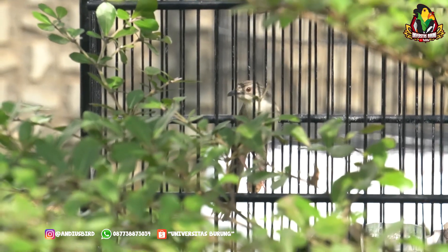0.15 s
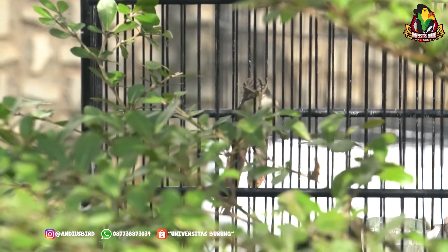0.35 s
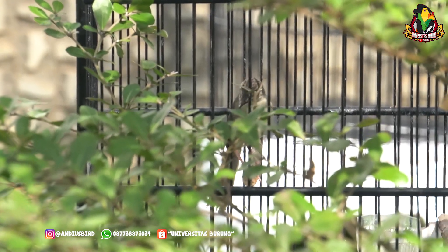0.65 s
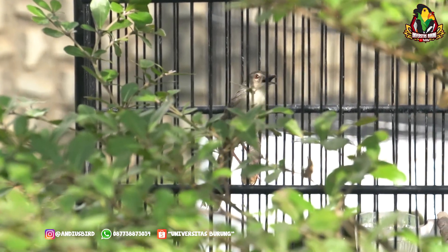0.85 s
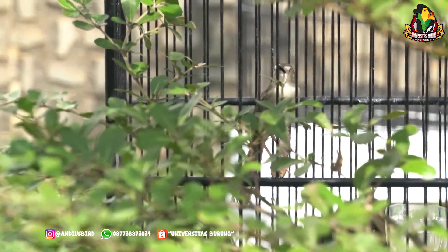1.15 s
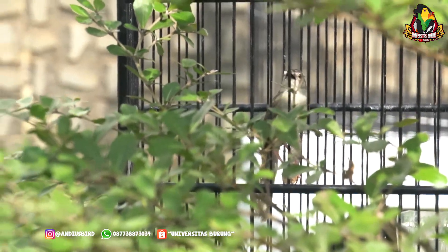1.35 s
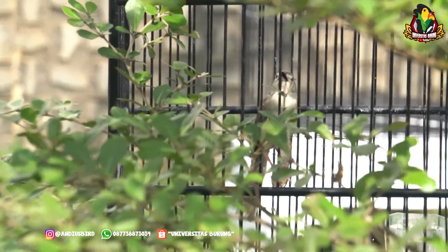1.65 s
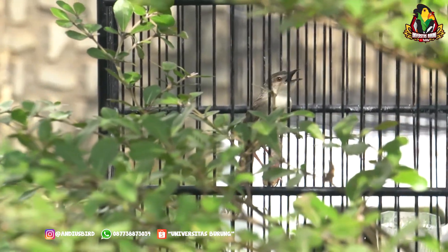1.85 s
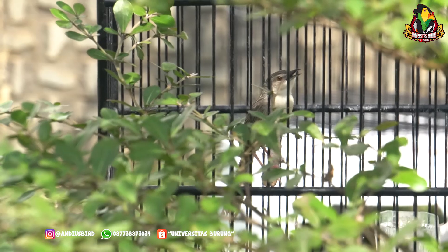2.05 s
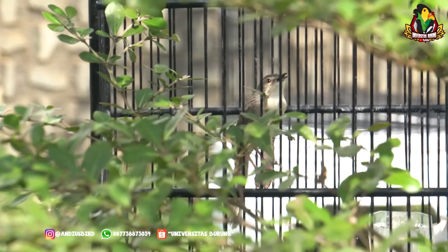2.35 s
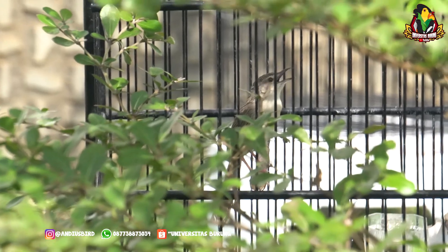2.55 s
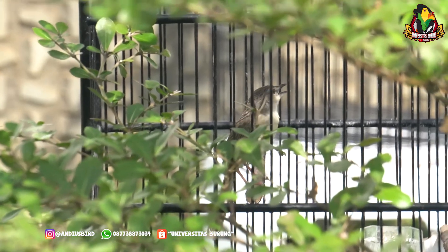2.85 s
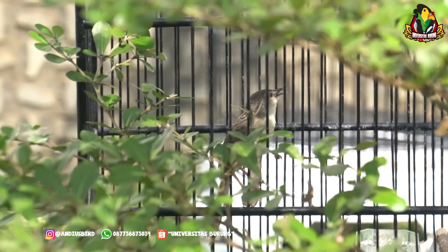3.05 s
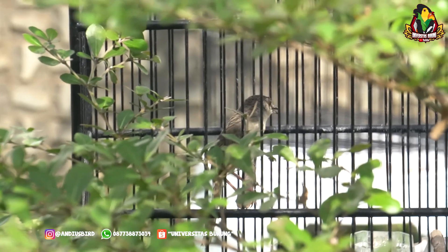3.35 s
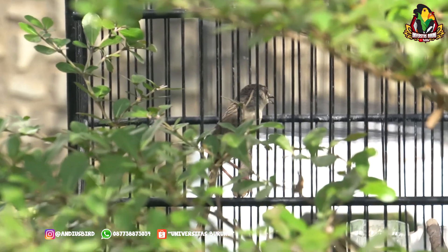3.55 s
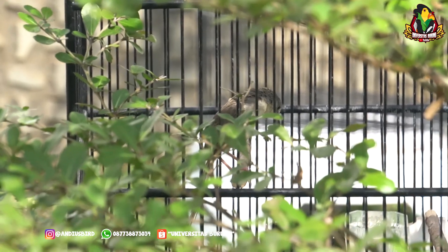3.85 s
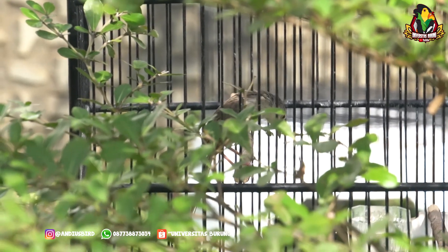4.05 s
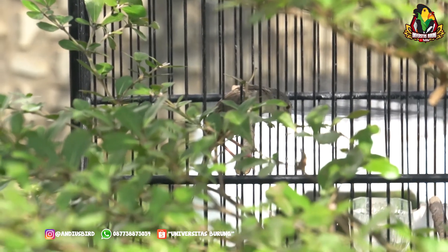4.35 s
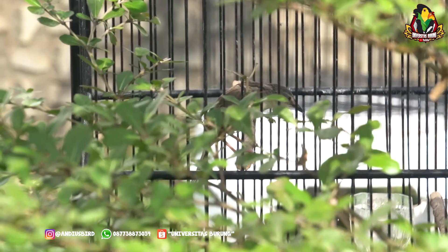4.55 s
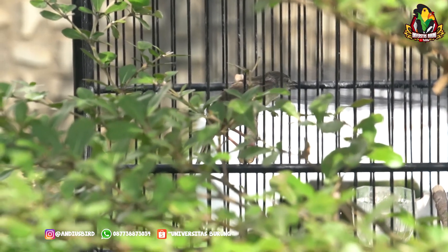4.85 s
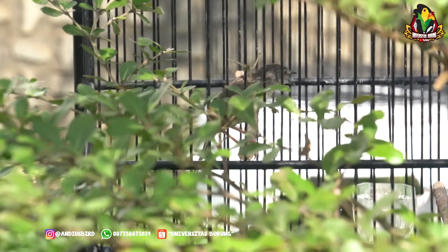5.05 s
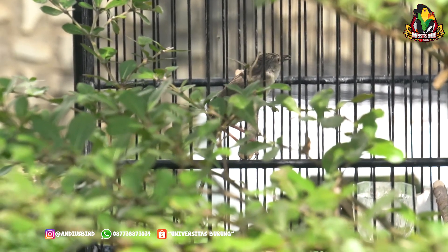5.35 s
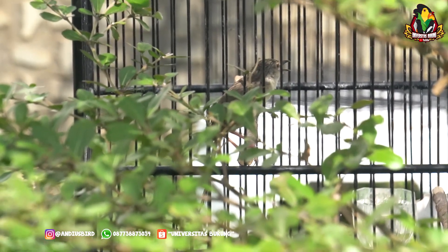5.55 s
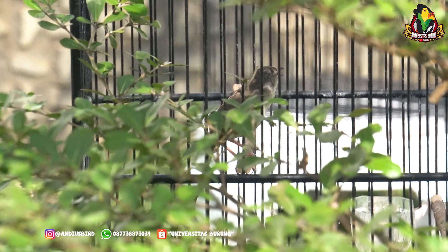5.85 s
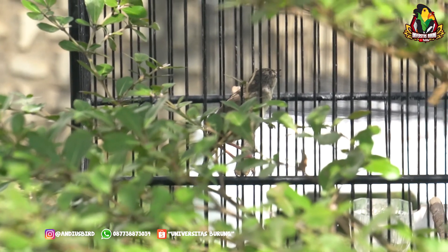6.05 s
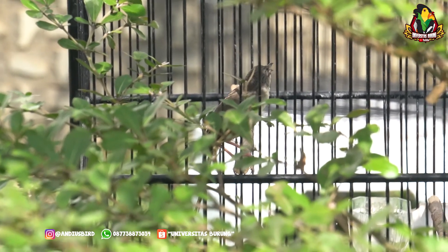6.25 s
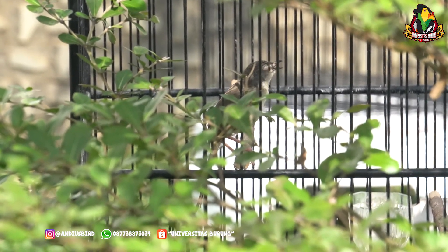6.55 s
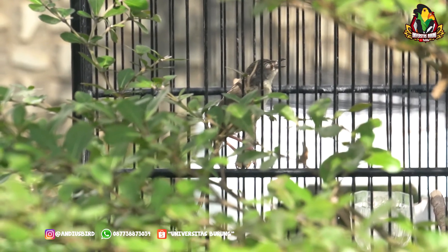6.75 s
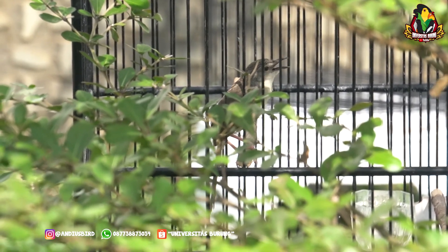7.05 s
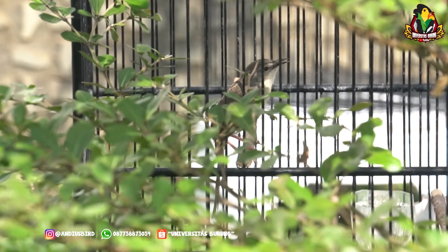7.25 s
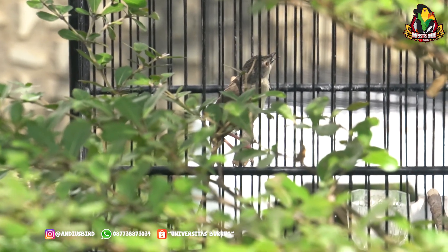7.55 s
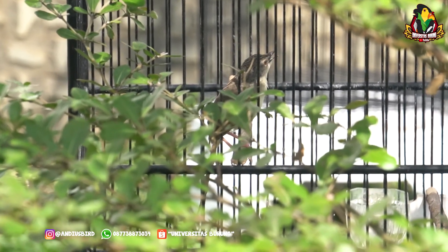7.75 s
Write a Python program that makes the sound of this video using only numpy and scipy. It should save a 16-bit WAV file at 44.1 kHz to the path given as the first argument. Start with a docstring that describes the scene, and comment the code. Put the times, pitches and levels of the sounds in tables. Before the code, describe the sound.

A small caged songbird sings close to the microphone in a walled yard, over soft low rumble, a gentle rush and a faint continuous high trill from a far bird. It opens with a quick warble and chirrup to 0.4 s, pauses, then gives quiet hoarse rasps from 0.75. Fast piercing falling whistles and rounder arching ones run from 1.1 to 1.65. A distant hoot at 1.1, a rooster crow around 1.5 to 2.4 and another hoot at 2.1 echo faintly. A dull thud lands at 1.8; whistles return 1.95-2.45. A hollow knock at 2.8 leads into whistles to 3.4 and warbles to 3.9, with a faint jerky scrape from 3 to 4. Brief warbling to 4.2, then sparse rasps and a weak bump near 4.7. Dense warbling fills 5.15-5.8, whistles 6.0-6.5, soft rasps, then warbles and a final strong whistle run 6.7-7.35, leaving quiet yard ambience.

```python
"""Warbled notes of a small caged songbird, close by in a walled yard, over a thin far trill and a faint rumble.
The songbird is a gliding harmonic voice: whistled slurs and arches, clear notes, chirrups, rasps and ticks.
A distant rooster crows once between a far hoot and the end of another; both are harmonic, heard as echoes.
Something hollow nearby is knocked and dragged: noise bursts excite decaying sines.
The rumble and a low rush are shaped noise."""
import sys
import numpy as np
from scipy import signal
from scipy.fft import rfft, irfft
from scipy.io import wavfile
from scipy.ndimage import uniform_filter1d

SR = 44100
rng = np.random.default_rng(int(sys.argv[2]) if len(sys.argv) > 2 else 0)


def pcm_store(signal):
    """Save signal as 16-bit PCM."""
    levels = np.round(np.clip(np.atleast_2d(signal), -1, 1) * 32767)
    wavfile.write(sys.argv[1], SR, levels.astype(np.int16).T)


N = 348831
TIME = np.arange(N) / SR


def undb(db):
    """Decibels to gain."""
    return 10 ** (np.asarray(db) / 20)


def unit(x):
    """Scale to rms 1."""
    return x / np.sqrt(np.mean(x ** 2))


def colour(hz, points):
    """Gain at hz of a (freq_hz, gain_db) spectrum, interpolated over log frequency."""
    freq_hz, gain_db = np.transpose(points)
    return undb(np.interp(np.log(hz + 1), np.log(freq_hz), gain_db))


def noise(points):
    """Gaussian noise with a (freq_hz, gain_db) spectrum, rms 1."""
    spectrum = rfft(rng.standard_normal(N))
    return unit(irfft(spectrum * colour(np.fft.rfftfreq(N, 1 / SR), points), N))


def wander(count, hz):
    """Random motion: noise low-passed at hz, rms 1."""
    lowpass = signal.butter(2, hz, fs=SR, output="sos")
    white = rng.standard_normal(max(count, SR // 2) + SR // 10)
    return unit(signal.sosfilt(lowpass, white[-count:]))


def fade(t, t60_s):
    """Exponential decay, 60 dB in t60_s."""
    return np.exp(-np.log(1000) * t / t60_s)


def add(out, start_s, x):
    """Mix x into out at start_s."""
    i = max(int(start_s * SR), 0)
    out[i:i + len(x)] += x[:max(N - i, 0)]


def edges(t, ramp_s):
    """Sine-squared start and stop of a note."""
    from_edge_s = np.minimum(t - t[0], t[-1] - t)
    return np.sin(np.pi / 2 * np.clip(from_edge_s / ramp_s, 0, 1)) ** 2


def voice(hz, tract, octave_db, count=6):
    """Harmonics of a vibrating membrane, weighted by the tract as they glide through it; constant power."""
    k = np.arange(1, count + 1)[:, None]
    weight = undb(octave_db * np.log2(k)) * colour(k * hz, tract) * (k * hz < SR / 2)
    phase = 2 * np.pi * k * np.cumsum(hz) / SR
    return np.sum(weight * np.sin(phase), 0) / np.sqrt(np.sum(weight ** 2, 0))


def echoes(x, t60_s, early_t60_s=0.31, early_db=4):
    """Convolve with decaying noise: scatter from bars and leaves, then yard walls; unit-energy response."""
    t = TIME[:SR]
    tail = noise([(200, 9.0), (6500, -1.0), (9000, 0.5), (16000, 2.5)])[:SR]
    decay = fade(t, t60_s) + undb(early_db) * fade(t, early_t60_s)
    tail *= decay * np.clip(t / 0.00078, 0, 1)
    return signal.fftconvolve(x, tail / np.linalg.norm(tail))[:N]


RUMBLE_DB = -45.5
# outdoor rumble spectrum: freq_hz, density_db_per_hz
RUMBLE_SPECTRUM = [(25, -26), (70, 1.5), (160, 3), (400, -15.5), (2500, -15.5), (6000, -7.5),
                   (16000, -37.5)]
# low rush from further off, level course: time_s, level_db
RUSH_LEVEL = [(0, -53), (1.2, -46.5), (3.8, -50), (4.3, -55)]
# rush spectrum: freq_hz, density_db_per_hz
RUSH_SPECTRUM = [(100, -13), (300, -1), (1600, -6.5), (16000, -38)]


def outdoors():
    """Shaped noise: a steady rumble, and a rush that unevenly swells and sinks."""
    rush_db = np.interp(TIME, *np.transpose(RUSH_LEVEL)) + 0.61 * wander(N, 12)
    return undb(RUMBLE_DB) * noise(RUMBLE_SPECTRUM) + undb(rush_db) * noise(RUSH_SPECTRUM)


def far_bird(period_s=0.048, length_s=0.0227, count=220):
    """A continuous thin trill of short drooping sines, some followed by a longer gap."""
    out, t = np.zeros(N), np.arange(0, length_s, 1 / SR)
    chance = rng.standard_normal((count, 4))
    gap = 0.6 * (chance[:, 1] > 0.6)
    starts_s = np.cumsum(period_s * (1 + 0.12 * chance[:, 0] + gap)) - period_s
    for start_s, (loud, sharp) in zip(starts_s, chance[:, 2:]):
        hz = (5830 - 520 * (t / length_s) ** 2) * (1 + 0.01 * sharp)
        tone = np.sin(2 * np.pi * np.cumsum(hz) / SR)
        add(out, start_s, undb(2.4 * loud) * tone * edges(t, 0.0034))
    return out


HOOT_HZ = 709
# colour of the far calls: freq_hz, gain_db
FAR_CALL = [(700, -5.5), (1450, 3.5), (2800, -20)]
# hoots: start_s, length_s, relative_level_db
HOOTS = [(1.135, 0.23, -40.5), (2.125, 0.42, -41.5)]


def hoots():
    """Two calls level in pitch, their second harmonic strongest."""
    swell = sum(undb(db) * np.sin(np.pi * np.clip((TIME - start_s) / length_s, 0, 1))
                for start_s, length_s, db in HOOTS)
    hz = HOOT_HZ * (1 + 0.0223 * wander(N, 62.4))
    return swell * voice(hz, FAR_CALL, octave_db=0)


# crow: time_s, pitch_hz, relative_level_db
CROW = [(1.361, 522, -62), (1.599, 638, -46), (1.68, 793.4, -45), (2.05, 814, -60), (2.3, 845, -44),
        (2.45, 827, -82)]


def rooster():
    """One crow that climbs to a held note, hoarse from random pitch and level."""
    time_s, pitch_hz, level_db = np.transpose(CROW)
    hz = np.interp(TIME, time_s, pitch_hz) * (1 + 0.055 * wander(N, 200))
    course_db = np.interp(TIME, time_s, level_db, left=-np.inf, right=-np.inf)
    return voice(hz, FAR_CALL, octave_db=-2) * undb(course_db + 4.0 * wander(N, 21))


# modes of the hollow object: freq_hz, gain_db, t60_s
HOLLOW = [(308.4, 8, 0.33), (678, 0, 0.28), (910, -1, 0.16)]


def hollow(x):
    """Ring of the hollow object: decaying sine modes, unit-energy response."""
    t = TIME[:SR]
    ring = sum(undb(db) * np.sin(2 * np.pi * hz * t) * fade(t, t60_s) for hz, db, t60_s in HOLLOW)
    return signal.fftconvolve(x, ring / np.linalg.norm(ring))[:N]


# dull bumps: start_s, level_db, relative_ring_db, lowpass_hz
BUMPS = [(1.814, -22, -28, 760), (2.843, -26.5, -4, 2220), (4.678, -35.5, -13, 2500)]


def bumps():
    """Low-passed noise blows that set the hollow object ringing."""
    out = np.zeros(N)
    thud = noise([(70, -20), (330, -5.5), (1800, -7.5), (12000, -34)])
    for start_s, db, ring_db, lowpass_hz in BUMPS:
        since_s = TIME - start_s
        dull = signal.sosfilt(signal.butter(2, lowpass_hz, fs=SR, output="sos"), thud)
        blow = undb(db) * dull * fade(np.maximum(since_s, 0), 0.37) * np.clip(since_s / 0.0044, 0, 1)
        out += blow + undb(ring_db - 6.5) * hollow(blow)
    return out


# dragging: time_s, relative_level_db
DRAG = [(2.95, -60.5), (3.75, -47.5), (4.05, -67)]


def drag():
    """Jerky scrape noise, heard directly and through the hollow object."""
    course_db = np.interp(TIME, *np.transpose(DRAG), left=-np.inf, right=-np.inf)
    grip = undb(course_db + 3 * wander(N, 14))
    scrape = grip * noise([(60, -4), (250, 0.0), (1500, -2), (16000, -35)])
    return undb(5.0) * scrape + undb(-5.5) * hollow(scrape)


FOOT_HZ = 1962  # whistle pitch at the foot of its fall
WHISTLE_END = 1.167  # a whistle trails on to this multiple of its fall
RISE_BEND, ARCH_BEND = 0.75, 1.3  # above 1, the pitch lingers at the top
STRAIGHT_FALL_S = 0.024  # a slur this quick falls evenly; a longer one lingers at the top
# throat and open beak: freq_hz, gain_db
THROAT = [(2000, -12), (2450, -8.5), (3300, 5), (4000, 7.5), (5200, 6), (6700, -2), (7900, -7.5),
          (13000, -14), (16000, -35)]
# air pressure along a whistle: place (-1 start of rise, 0 top, 1 foot of fall), relative_db
PUSH = [(-0.87, -39.5), (-0.051, -4.5), (-0.15, -3.5), (0.19, -4), (0.58, -14), (1.084, -33.5)]


def whistle(top_hz, rise_s, fall_s, bend, attack_s):
    """A nearly pure note: pitch and pressure climb to the top and sink again, a little unevenly."""
    t = np.arange(-int(rise_s * SR), int(WHISTLE_END * fall_s * SR)) / SR
    place = t / np.where(t < 0, rise_s, fall_s)
    depth = np.abs(place) ** np.where(t < 0, RISE_BEND, bend)
    hz = top_hz * (FOOT_HZ / top_hz) ** depth * (1 + 0.0092 * wander(len(t), 213))
    push_db = np.interp(place, *np.transpose(PUSH)) + 1.4 * wander(len(t), 125)
    return voice(hz, THROAT, octave_db=-12.5) * undb(push_db + 1) * edges(t, attack_s)


# falling whistles: start_s, top_hz, fall_s, relative_level_db
SLURS = [(1.136, 6620, 0.021, -4), (1.204, 6760, 0.022, -0.5), (1.2708, 7700, 0.023, -0.5),
         (1.342, 7860, 0.024, 1), (1.9543, 6600, 0.023, -1.5), (2.0236, 7200, 0.026, -6),
         (2.176, 7230, 0.026, -1.5), (2.664, 6940, 0.022, 0), (2.8916, 6750, 0.023, -0.5),
         (2.958, 7630, 0.027, 1), (3.026, 7700, 0.027, 1.5), (3.104, 7700, 0.029, 0.5),
         (6.0229, 6730, 0.024, -1.5), (6.097, 7790, 0.022, 0), (6.169, 7300, 0.028, 1),
         (6.246, 7710, 0.034, -0.5), (6.86, 7460, 0.028, 0), (6.9346, 7600, 0.028, 2),
         (7.013, 7600, 0.029, 0), (7.0895, 7540, 0.031, 0)]
# rising then falling whistles: top_s, top_hz, rise_s, fall_s, relative_level_db
ARCHES = [(1.405, 6850, 0.027, 0.033, -4), (1.472, 6650, 0.034, 0.037, -4), (1.54, 6690, 0.04, 0.04, -5),
          (1.6025, 6930, 0.017, 0.038, -4), (2.101, 6985, 0.007, 0.03, -1.5),
          (2.2455, 7390, 0.016, 0.029, -1.5), (2.32, 6470, 0.037, 0.044, -4.5),
          (2.3925, 6430, 0.022, 0.051, -3), (3.173, 7420, 0.012, 0.032, -2.5),
          (3.247, 7250, 0.041, 0.034, -4), (3.318, 7090, 0.025, 0.048, -2.5),
          (5.494, 7150, 0.012, 0.031, -8), (5.565, 7060, 0.02, 0.036, -11), (5.629, 6930, 0.019, 0.048, -9),
          (5.689, 7070, 0.014, 0.047, -4), (6.31, 7250, 0.035, 0.036, -4),
          (6.384, 7060, 0.035, 0.036, -3.5), (6.444, 6800, 0.013, 0.048, -3),
          (6.7901, 5890, 0.0065, 0.021, -5), (7.151, 7110, 0.038, 0.033, -4),
          (7.2216, 6900, 0.035, 0.048, -4), (7.2998, 6850, 0.014, 0.044, -4)]


def whistles():
    """Slurs start at their top pitch; arches rise to it first."""
    out = np.zeros(N)
    for start_s, hz, fall_s, db in SLURS:
        add(out, start_s, undb(db) * whistle(hz, 0, fall_s, fall_s / STRAIGHT_FALL_S, attack_s=0.0035))
    for top_s, hz, rise_s, fall_s, db in ARCHES:
        add(out, top_s - rise_s, undb(db) * whistle(hz, rise_s, fall_s, ARCH_BEND, attack_s=0.0033))
    return out


WOBBLE, RASP_WOBBLE, WOBBLE_HZ = 0.01, 0.03, 90.5  # pitch share, share added at roughness 1, speed
NOTE_RAMP_S = 0.001  # edge ramp at FULL_EFFORT_DB
FULL_EFFORT_DB, RAMP_DOUBLES_DB = -6, 5.5  # ramp doubles for each such drop in level


def warble(rows, rough, leap_rough=0.0048, jitter=0.0795, shimmer=0.37, onset_rough=0.43, settle_s=0.008):
    """Reedy note; the syrinx is chaotic at onset and pitch leaps, its second side joins out of tune."""
    time_s, pitch_hz, level_db = np.transpose(rows)
    t = np.arange(time_s[0], time_s[-1], 1 / SR)
    octave = uniform_filter1d(np.interp(t, time_s, np.log2(pitch_hz)), size=120)
    leap = uniform_filter1d(np.abs(np.gradient(octave)) * SR, size=350)  # octaves a second
    onset = np.exp((t[0] - t) / settle_s)
    chaos = np.clip(rough + leap_rough * leap + onset_rough * onset, 0, 1)
    hz = 2 ** octave * (1 + (WOBBLE + RASP_WOBBLE * rough) * wander(len(t), WOBBLE_HZ))
    # the note, second side, undertone: pitch_ratio, strength, tilt_db_per_octave
    sides = [(0.99, 0.8, -5), (0.66, 0.5 * chaos, -1.5), (0.5, 0.31 * chaos, 3.5)]
    tone = 0
    for ratio, strength, tilt_db in sides:
        jittered_hz = ratio * hz * (1 + jitter * chaos * wander(len(t), 740))
        tone = tone + strength * voice(jittered_hz, THROAT, tilt_db)
    ramp_s = NOTE_RAMP_S * 2 ** ((FULL_EFFORT_DB - level_db.max()) / RAMP_DOUBLES_DB)
    ramp_s = min(ramp_s, (t[-1] - t[0]) / 3)
    flutter = 1 + shimmer * np.sqrt(chaos) * wander(len(t), 204)
    loudness = undb(np.interp(t, time_s, level_db)) * edges(t, ramp_s)
    sound = tone * flutter / np.sqrt(1 + chaos ** 2) * loudness
    # so small a beak radiates little below the foot pitch
    beak = signal.butter(N=8, Wn=FOOT_HZ, btype="high", fs=SR, output="sos")
    return signal.sosfilt(beak, np.pad(sound, (0, SR // 100)))


GLIDE_S, NOTE_SWELL_DB = 0.0065, 1.5  # glide time constant; a note's ends are this much softer


def note(start_s, length_s, hz, start_octaves, end_octaves, db):
    """Course (time_s, pitch_hz, level_db): glides onto its pitch, swells and glides off."""
    t = np.arange(0, length_s, 1 / SR)
    octaves = start_octaves * np.exp(-t / GLIDE_S) + end_octaves * np.exp((t - length_s) / GLIDE_S)
    swell_db = db - NOTE_SWELL_DB * (2 * t / length_s - 1) ** 2
    return np.column_stack([start_s + t, hz * 2 ** octaves, swell_db])


NOTE_ROUGH = 0.15
# clear notes: start_s, length_s, pitch_hz, start_octaves, end_octaves, relative_level_db
NOTES = [(0, 0.025, 5400, -0.11, 0.47, -6.5), (.028, 0.05, 4043, 0.21, .05, -4.5),
         (.078, 0.021, 4685, 0.25, -0.058, -9), (1.975, 0.042, 2723, -0.42, -0.15, -6),
         (2.018, 0.046, 3973, -0.097, -0.12, -8.5), (2.058, .024, 3140, 0.25, 0.12, -9.5),
         (2.079, 0.027, 6816, -0.21, 0.025, -9), (2.127, 0.053, 4026, -0.53, 0.22, -5.5),
         (2.183, 0.051, 4850, -.12, -0.14, -9.5), (3.358, 0.055, 3310, -0.17, -0.14, -6.5),
         (3.416, 0.04, 6540, -0.18, 0.11, -9), (3.487, 0.02, 2216, -0.059, 0.22, -12),
         (3.534, 0.033, 6610, -.1, 0.037, -6.5), (4.008, 0.037, 2404, .1, -0.31, -13),
         (4.044, 0.051, 3830, -0.56, 0.4, -7), (4.09, 0.035, 6360, -.45, -0.35, -9.5),
         (4.152, 0.033, 3478, 0.18, -0.43, -9.5), (4.186, 0.02, 5120, 0.31, -0.065, -10.5),
         (5.163, 0.014, 2080, -0.17, 0.24, -7), (5.18, 0.027, 6530, -0.45, -0.052, -9.5),
         (5.208, .058, 3420, 0.39, .35, -5.5), (5.265, 0.03, 5050, 0.35, 0.066, -9),
         (5.304, .035, 2290, -0.24, 0.79, -6.5), (5.339, 0.033, 4405, 0.71, 0.052, -10.5),
         (5.34, .029, 2673, 0.036, -0.23, -7.5), (5.369, 0.052, 4035, -0.31, -0.026, -7),
         (5.412, 0.029, 3105, .2, 0.032, -8.5), (5.436, 0.034, 6780, -0.35, -0.013, -8.5),
         (5.487, 0.051, 3930, -0.4, 0.34, -7), (5.541, .024, 4590, -0.08, 0.38, -6),
         (6.733, 0.031, 3266, 0.16, 0.0041, -8), (6.76, 0.019, 2686, 0.066, 0.92, -9),
         (6.805, 0.039, 4880, -0.024, 0.012, -6), (6.848, .022, 2430, 0.044, .5, -12),
         (6.886, 0.017, 2685, 1, 0.14, -8.5), (6.905, 0.019, 4990, -0.054, -0.036, -6.5)]


def clear_notes():
    """Warbled notes, each gliding onto its pitch and flicking off it."""
    out = np.zeros(N)
    for start_s, *shape in NOTES:
        add(out, start_s, warble(note(start_s, *shape), NOTE_ROUGH))
    return out


RASP_PEAK = 0.352  # share of its length at which a rasp is loudest
RASP_FADE_DB, RASP_SAG = 9, 0.06  # its ends are softer, and flatter by this share


def rasp(start_s, length_s, hz, db):
    """Course (time_s, pitch_hz, level_db): pitch and level rise with the effort and sink with it."""
    slack = hz * (1 - RASP_SAG), db - RASP_FADE_DB
    return [(start_s, *slack), (start_s + RASP_PEAK * length_s, hz, db), (start_s + length_s, *slack)]


# rasps: start_s, length_s, pitch_hz, relative_level_db, roughness_0_to_1
RASPS = [(0.748, 0.13, 2822, -20.5, 0.42), (.87, .07, 2196, -24.5, 0.3), (0.912, 0.088, 6660, -28, 0.2),
         (0.983, .19, 2600, -20, 0.84), (1.069, 0.14, 4070, -18.5, 0.07), (1.75, .1, 4800, -30.5, .2),
         (2.796, 0.11, 4840, -29.5, 0.13), (3.503, 0.035, 4390, -4, .8), (4.619, 0.09, 4500, -17, 0.67),
         (4.686, 0.078, 5000, -17.5, 0.23), (5.171, .014, 5000, -5, .9), (5.466, 0.031, 2798, -6, 0.64),
         (6.405, .05, 4420, -14.5, .2), (6.465, .07, 3023, -14, 0.46), (6.517, 0.11, 4100, -15, 0.64),
         (6.716, 0.028, 4950, -8, 0.47), (6.773, 0.023, 5740, -5, 0.5)]


def rasps():
    """Hoarse notes that swell and die away."""
    out = np.zeros(N)
    for start_s, length_s, hz, db, rough in RASPS:
        add(out, start_s, warble(rasp(start_s, length_s, hz, db), rough))
    return out


# chirrup, a rise, a low buzz and then a dip: time_s, pitch_hz, relative_level_db
CHIRRUP = [(0, 2500, -20), (.012, 2850, -14), (.021, 4400, -9), (.025, 2600, -8), (.049, 2480, -11),
           (.055, 5000, -8), (.081, 3650, -6), (.094, 4800, -7), (.111, 3000, -16)]
# chirrup entries: start_s
CHIRRUP_AT = [.182, 3.668, 5.562]
# stepped "chuwee" that closes a phrase: time_s, pitch_hz, relative_level_db
CHUWEE = [(0, 3550, -19), (.012, 3480, -12), (.02, 2800, -11), (.023, 3930, -6), (.04, 4060, -5),
          (.044, 4570, -8), (.06, 4550, -15)]
# chuwee entries: start_s
CHUWEE_AT = [0.3465, 3.830, 5.737]


def set_figures():
    """Chirrup and chuwee, each sung afresh along its pitch course."""
    out = np.zeros(N)
    for figure, starts_s in (CHIRRUP, CHIRRUP_AT), (CHUWEE, CHUWEE_AT):
        for start_s in starts_s:
            add(out, start_s, warble(figure, NOTE_ROUGH))
    return out


def tick(length_s=0.00373, start_hz=5400, end_hz=1200):
    """One flick: pitch drops about two octaves in a few milliseconds."""
    t = np.arange(0, length_s, 1 / SR)
    hz = start_hz * (end_hz / start_hz) ** (t / length_s)
    return voice(hz, THROAT, octave_db=-15) * fade(t, 0.014) * edges(t, 0.0008)


# ticks: start_s, relative_level_db
TICKS = [(.771, -12), (.918, -5), (1.869, -8), (2.577, -5), (4.955, -5.5), (5.916, -8), (6.689, -7)]


def ticks():
    """Very fast downward flicks."""
    out = np.zeros(N)
    for start_s, db in TICKS:
        add(out, start_s, undb(db) * tick())
    return out


def songbird():
    """The whole song, all shaped by the same throat and beak."""
    return whistles() + clear_notes() + rasps() + set_figures() + ticks()


CAGE_DB, YARD_WASH_DB, YARD_T60_S = -4, -9, 0.68  # the song's reflections
TRILL_DB, TRILL_WASH_DB, FAR_CALLS_DB = -33, -33.5, 7


def scene():
    """Near bird mostly direct, with quick cage reflections; far calls only by way of the walls."""
    song, trill = songbird(), far_bird()
    cage = undb(CAGE_DB) * echoes(song, t60_s=0.025, early_t60_s=0.016)
    yard = undb(YARD_WASH_DB) * echoes(song, t60_s=YARD_T60_S)
    far_trill = undb(TRILL_DB) * trill + undb(TRILL_WASH_DB) * echoes(trill, t60_s=0.34)
    far_calls = undb(FAR_CALLS_DB) * echoes(rooster() + hoots(), t60_s=3.3, early_db=17.5)
    return (song + cage + yard + far_trill + far_calls + bumps() + drag() + outdoors())[None]


TOP_HZ = 16000


def record(dry):
    """Peaks are rounded off at full scale; the top is cut above TOP_HZ."""
    rounded = dry / (1 + np.abs(dry) ** 10) ** (1 / 10)
    return signal.sosfiltfilt(signal.ellip(8, 0.1, 60, TOP_HZ, fs=SR, output="sos"), rounded)


dry = scene()
out = record(dry)
pcm_store(out)
```